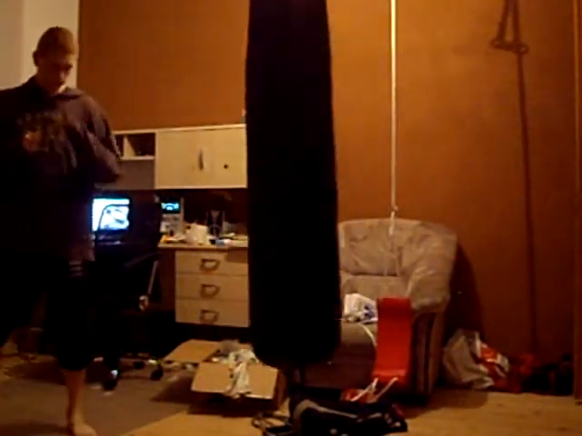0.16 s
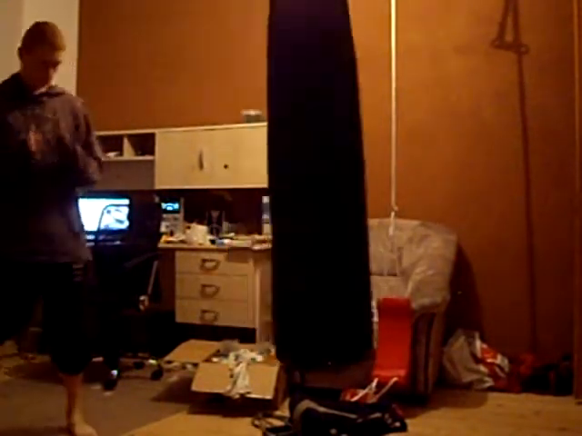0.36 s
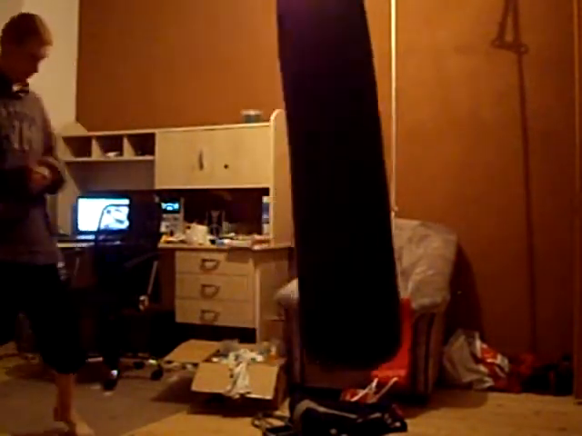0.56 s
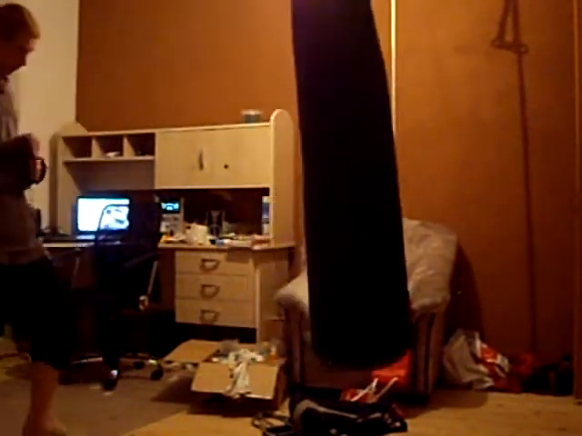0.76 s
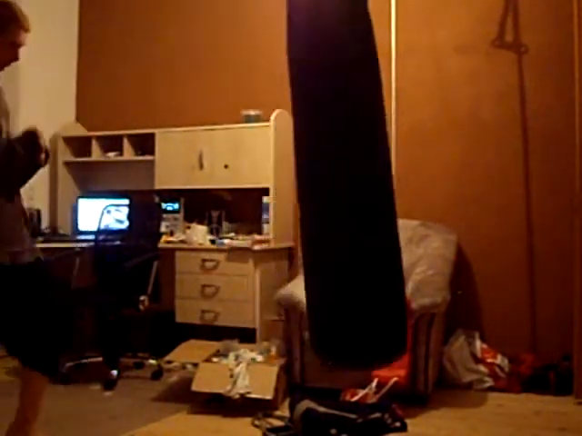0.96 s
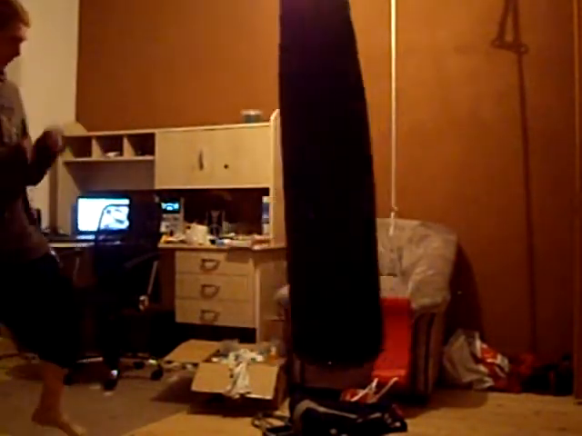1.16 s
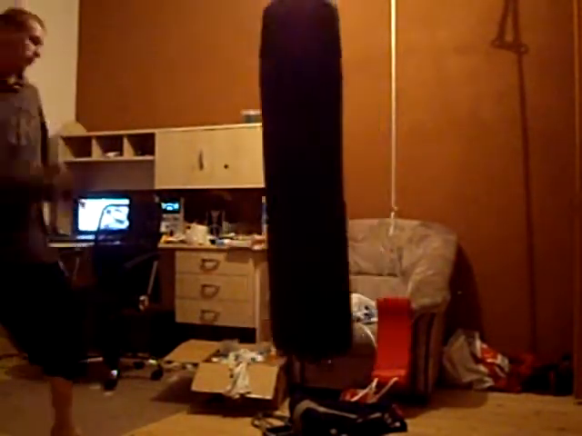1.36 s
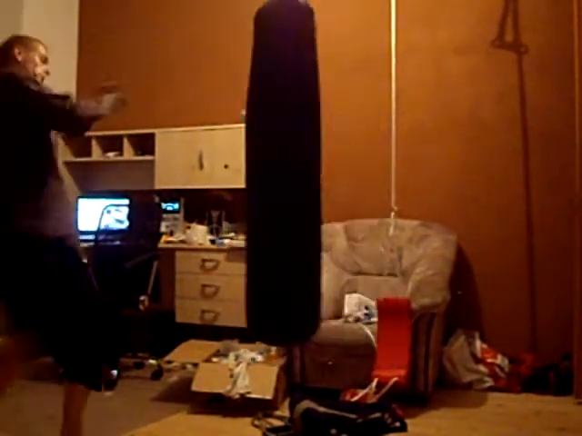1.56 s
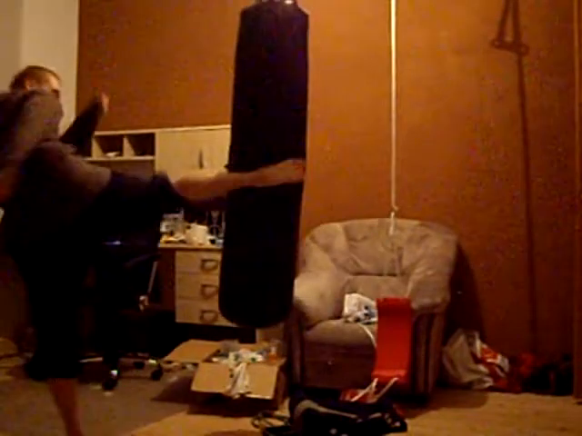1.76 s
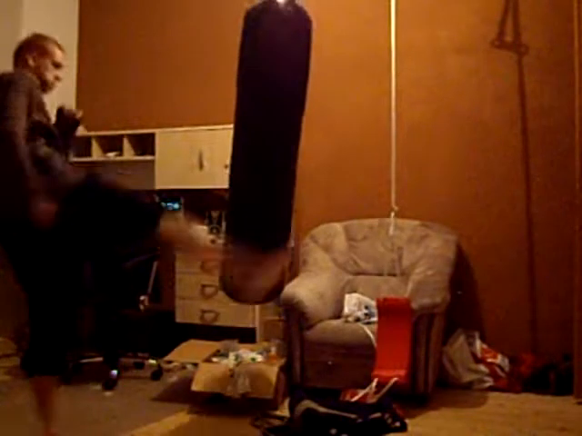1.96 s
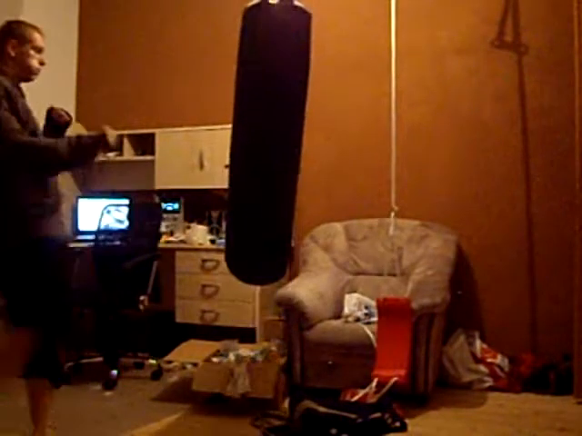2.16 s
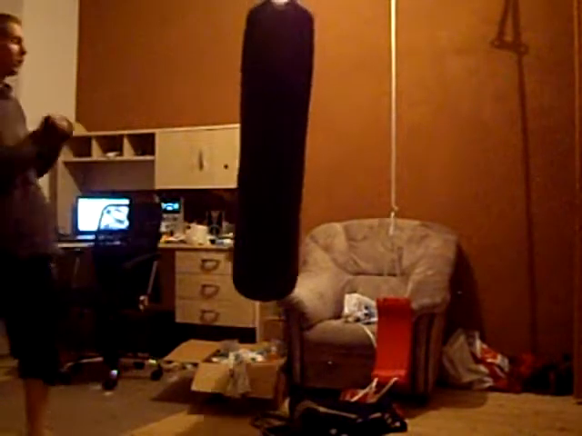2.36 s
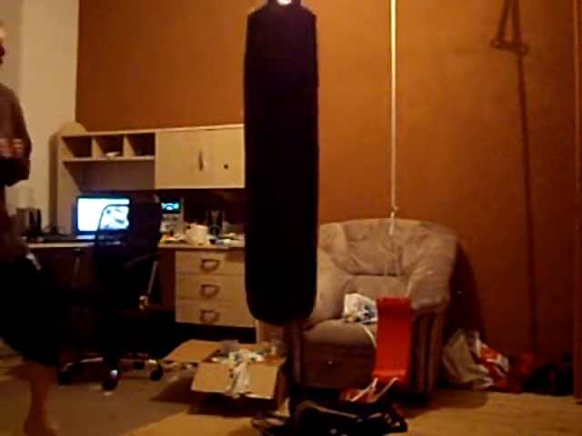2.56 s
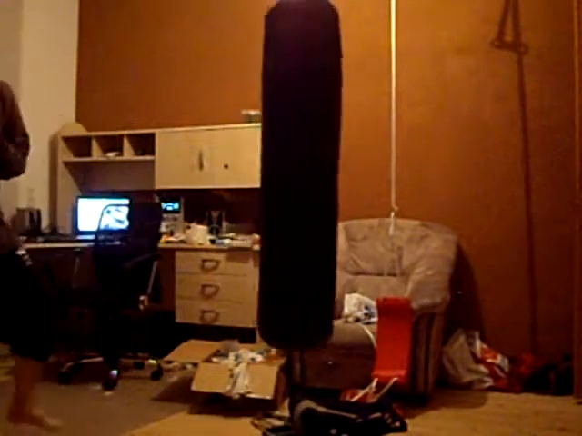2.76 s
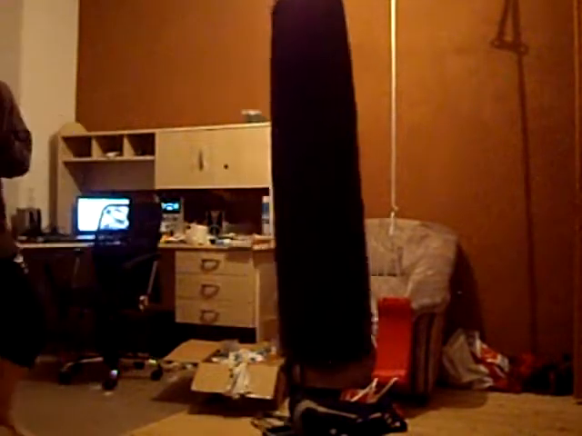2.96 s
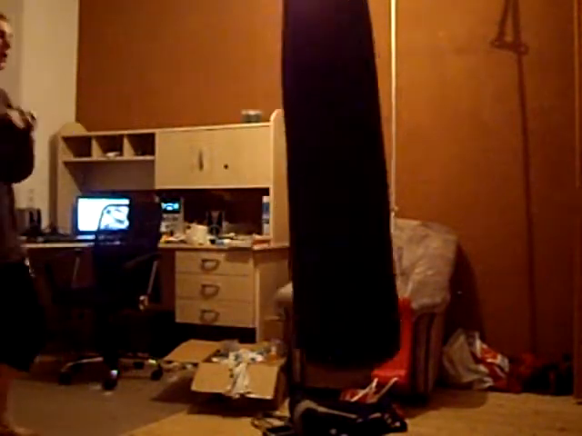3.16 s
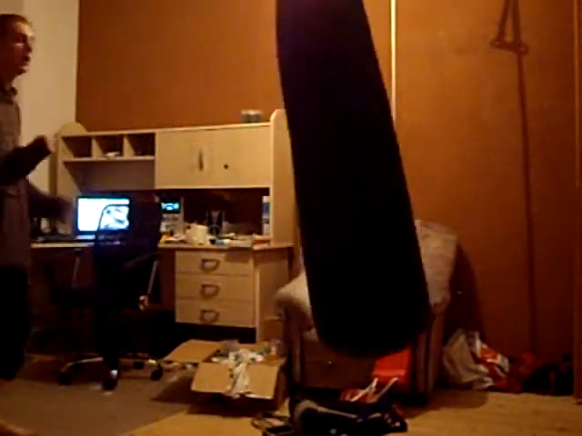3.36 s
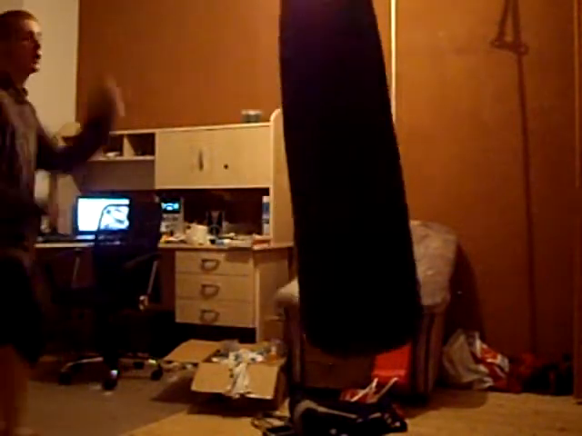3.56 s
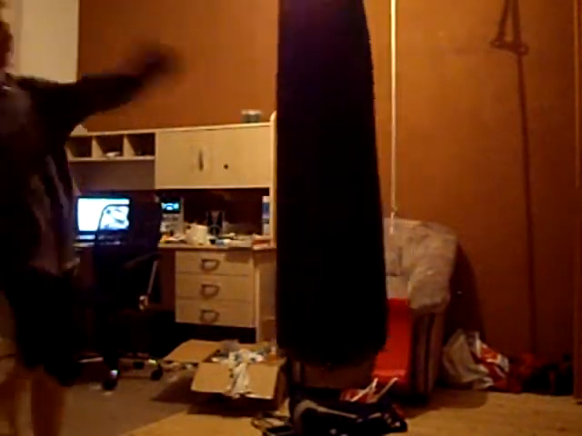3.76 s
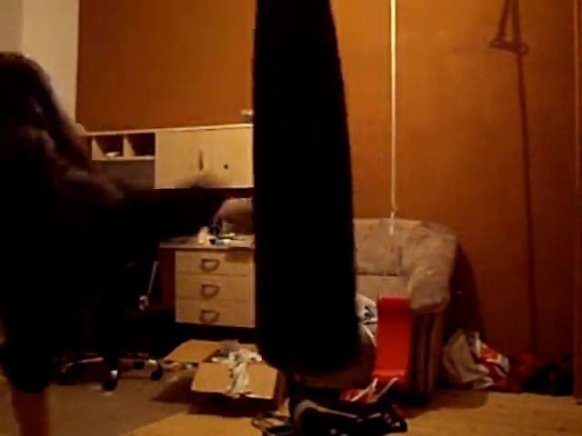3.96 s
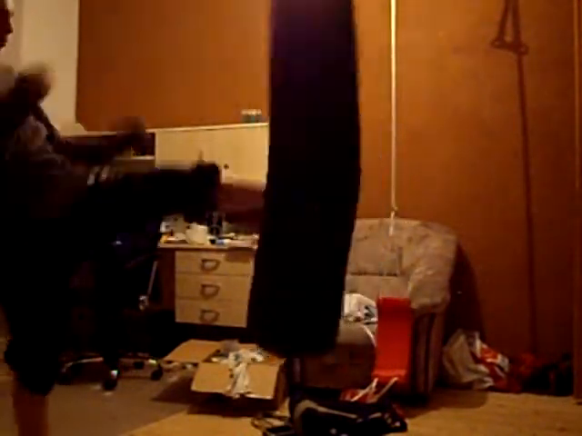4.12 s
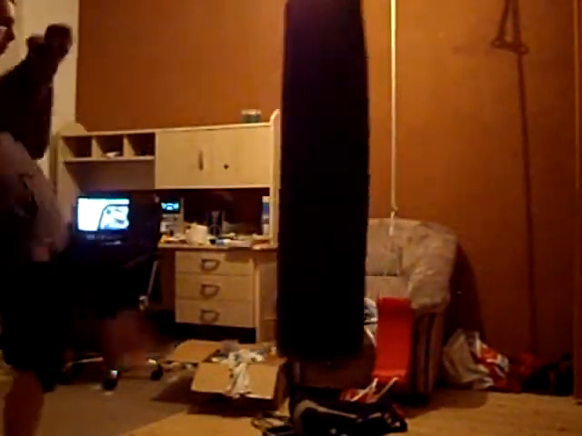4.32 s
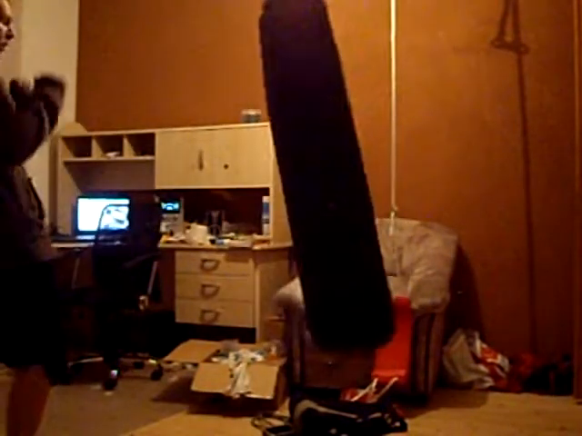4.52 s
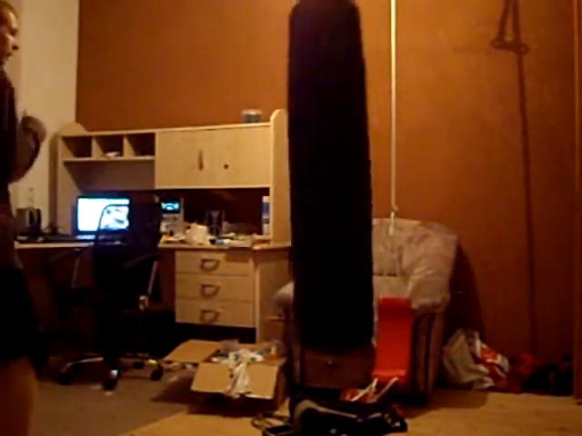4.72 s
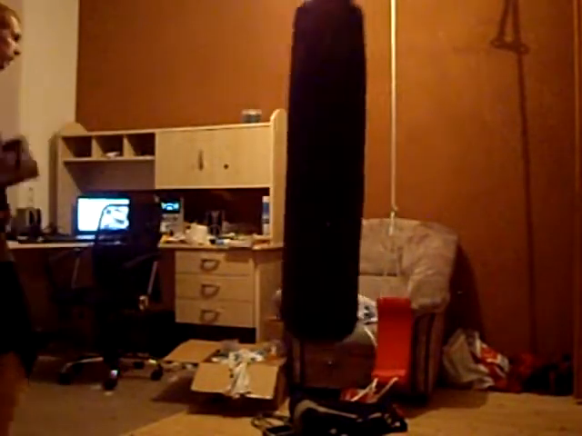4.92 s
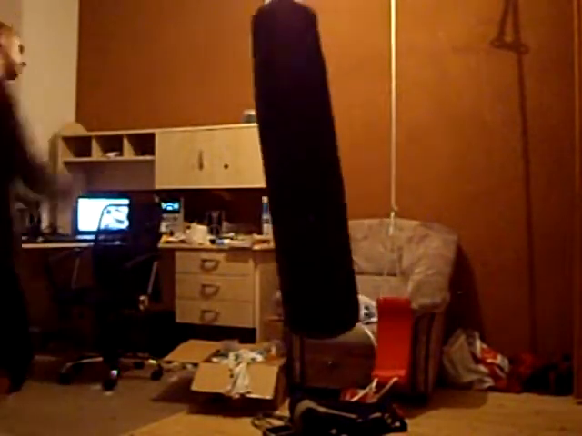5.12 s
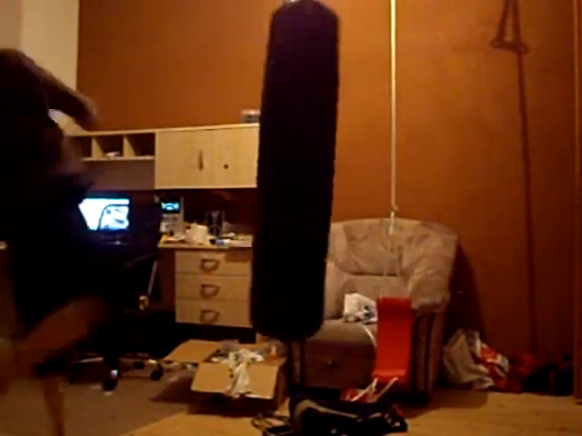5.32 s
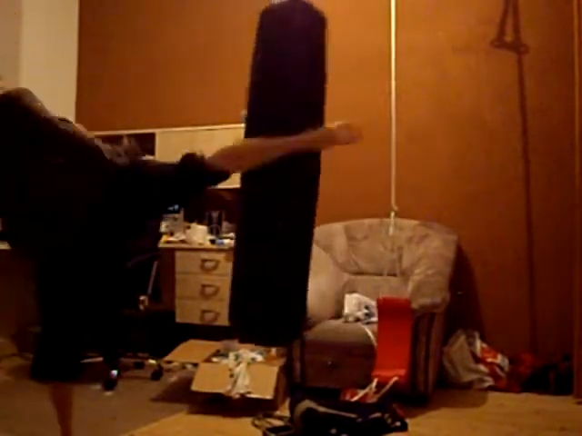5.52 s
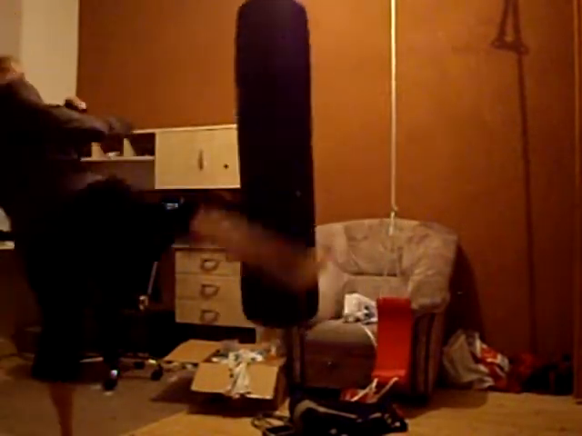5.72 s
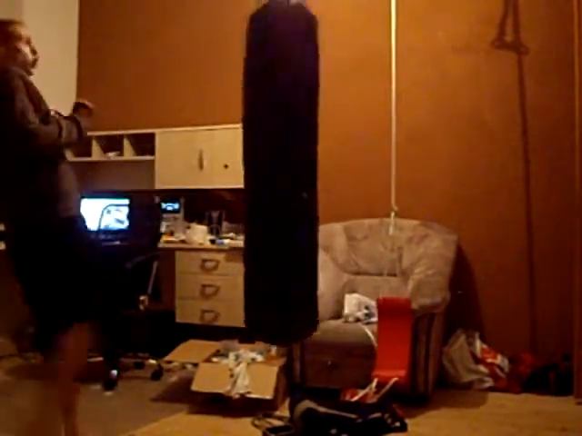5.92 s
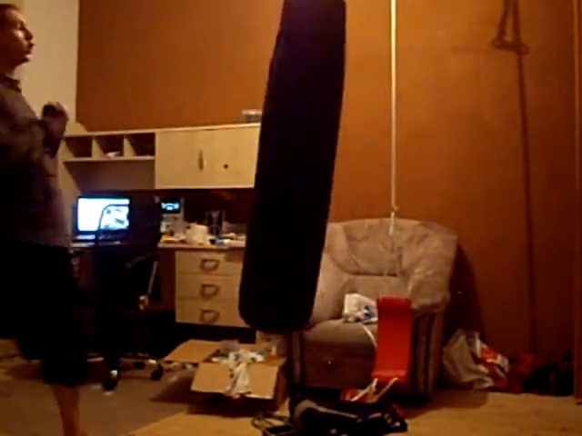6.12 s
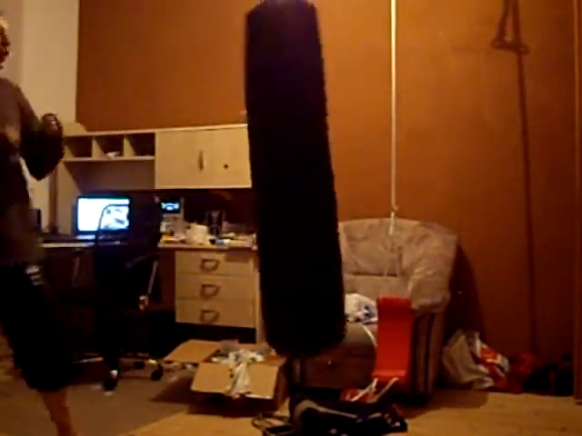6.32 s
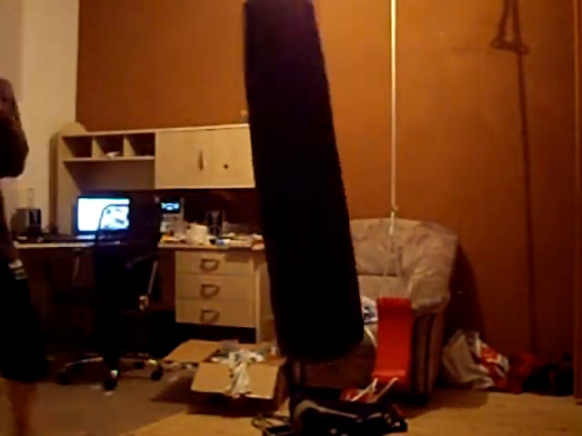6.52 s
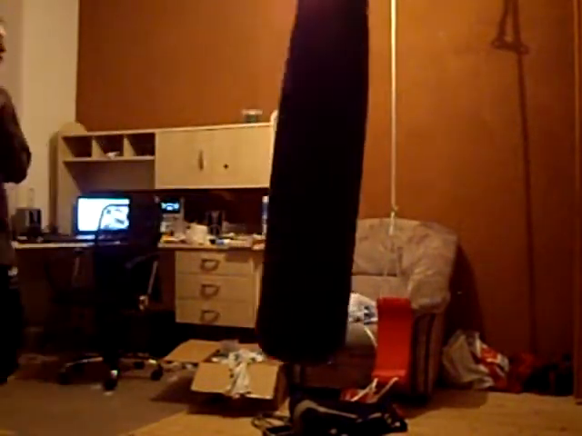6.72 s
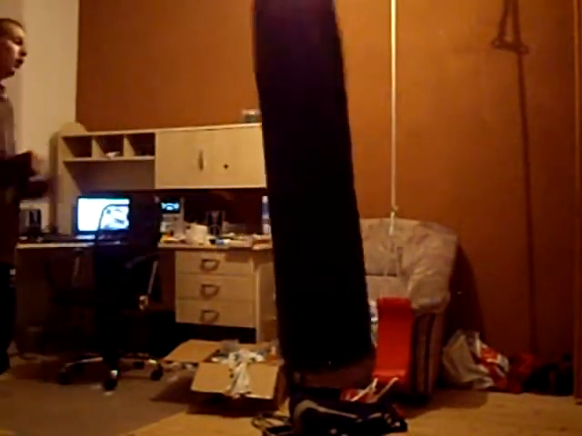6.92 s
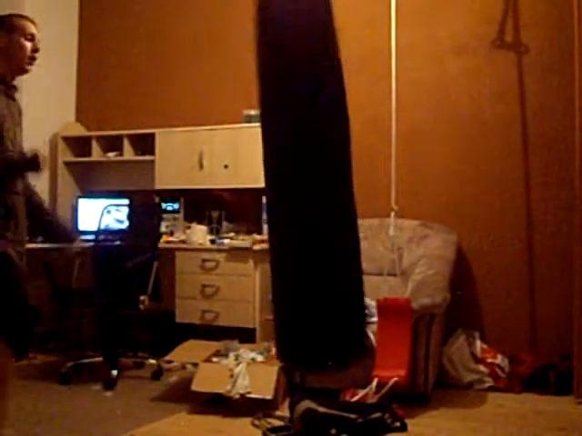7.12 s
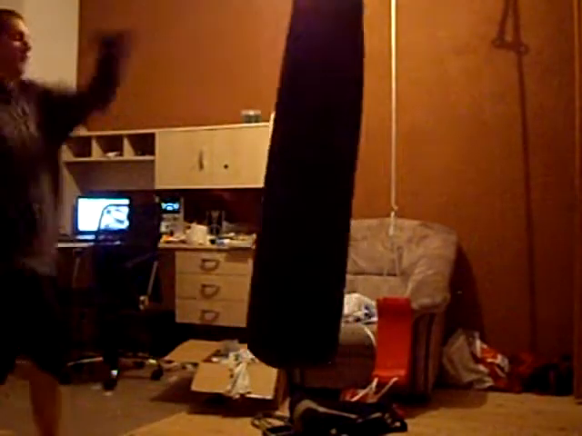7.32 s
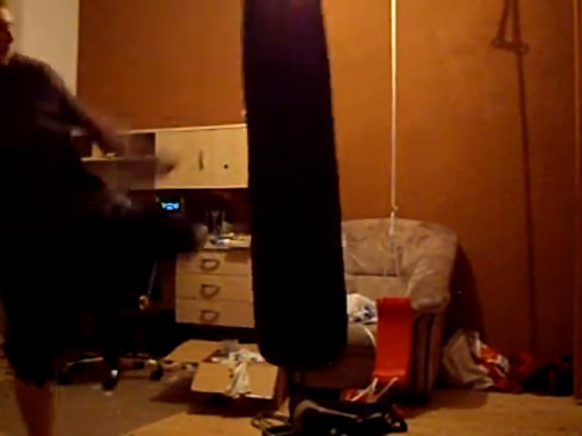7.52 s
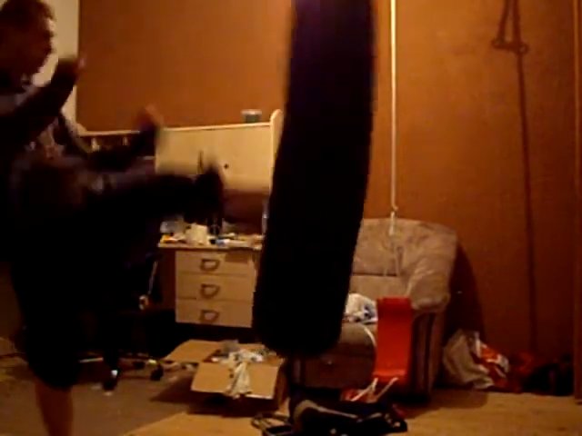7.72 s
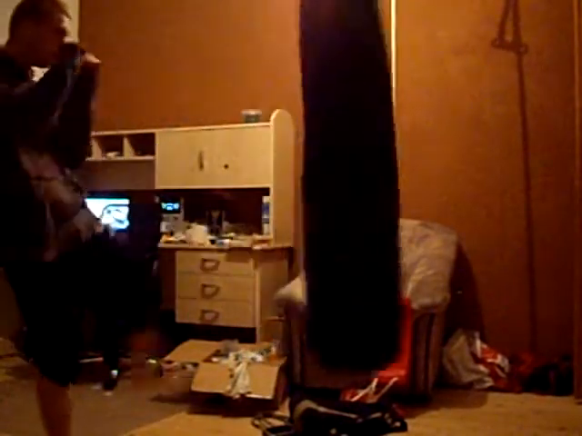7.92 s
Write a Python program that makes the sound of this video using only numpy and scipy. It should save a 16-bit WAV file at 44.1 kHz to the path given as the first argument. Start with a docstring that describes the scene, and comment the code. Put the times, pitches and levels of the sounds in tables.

```python
"""Bare feet step about on a springy wooden floor in a furnished room, clothes swishing, as a faint ring dies
away. Then four kicks hit a heavy hanging bag, the third softer, with footwork between: each kick sums damped
sines (thud of the filling, deep boom of the room) and two noise bursts (slap of the cover). Kicks and steps
feed a slow floor bounce; a low noise rises and falls with it; small pops follow the first kick. Hiss and rumble
run throughout; the sound is narrow-band with a notch, and loud peaks overload."""
import sys
import numpy as np
from scipy import signal
from scipy.fft import rfft, irfft
from scipy.io import wavfile
from scipy.ndimage import uniform_filter1d

SR = 44100
rng = np.random.default_rng(int(sys.argv[2]) if len(sys.argv) > 2 else 0)


def generate_wav(sig):
    """Save sig (samples, or channels by samples) to the path in sys.argv[1] as 16-bit PCM at SR."""
    pcm = np.round(np.clip(np.atleast_2d(sig).T, -1, 1) * 32767).astype(np.int16)
    wavfile.write(sys.argv[1], SR, pcm)


N = 356328
TIME_S = np.arange(N) / SR

# Levels in the tables are relative; each source adds its own gain.
# Kicks at first touch; the shin lands flat landing_s later: start_s, touch_db (re slap), landing_s,
# slap_db, slap_decay_s, tilt_db_per_octave, thud_db, boom_db, bounce_db
KICKS = [(1.7264, -3.5, .006, 0, 0.016, 0.84, -2.5, -3.5, -12.5),
         (3.991, -8.5, .016, -1, 0.02, 0.5, 0.5, -5.5, -10.5),
         (5.503, -7.5, .009, -10, 0.018, 0.2, -25, -12, -10.5),
         (7.563, -12, .011, -2, 0.026, 0.5, -6.5, -5, -15)]
# Slap of the cover: freq_hz, density_db (per Hz)
SLAP_SPECTRUM = [(100, 9), (200, 2.5), (310, -0.5), (450, 2), (750, 0), (1100, 0), (1600, -1.5), (2100, -4),
                 (3000, -4), (4200, -10), (5300, -7)]
# Hollow resonances of cover and nearby cabinets: freq_hz, width_hz, level_db (re broad slap)
SLAP_PEAKS = [(204.6, 18, -1), (270.3, 13, -1.5), (353.6, 8.5, -3), (526, 20, -3), (700, 48, -6),
              (843, 47, -6), (1108, 31, -7), (1290, 82, -13), (1570, 87, -8), (1772, 26, -3),
              (1920, 28, -5), (2677, 40, -7)]
# Packed filling: freq_hz, level_db, t60_s
BAG_MODES = [(73.4, -2.5, 0.17), (105.2, -9, 0.43), (149, -10, 0.27), (205.5, -10, 0.25)]
# Deep resonances of room and floor: freq_hz, level_db, t60_s
BOOM_MODES = [(33.18, -1.5, 1.29), (45.4, -22.5, 0.6), (57.2, -11, 0.83), (74, -18.5, 0.75),
              (129, -18, 0.69)]
# Reverberation: freq_hz, t60_s
ROOM_T60 = [(100, 0.28), (250, 0.37), (500, 0.51), (1000, 0.5), (2000, 0.51), (4000, 0.52), (5500, 0.46)]
# Footfalls: start_s, level_db, heel_db (weight on the heel)
STEPS = [(0.01, -45.5, 4.5), (0.344, -30, -12.5), (0.435, -31.5, -3), (0.801, -32, -12.5), (1.417, -39, 7),
         (1.486, -30, -6.5), (1.621, -31, -6.5), (1.683, -31.5, -7.5), (2.019, -28, -12.5),
         (2.292, -30, -11), (2.378, -28.5, -10.5), (2.835, -25, -26), (3.176, -25.5, -28),
         (3.339, -36.5, -6.5), (3.667, -24.5, 2.5), (3.715, -22.5, -0.5), (4.514, -26, -26.5),
         (5.139, -27.5, -5), (5.324, -26, 5.5), (5.381, -31, 10), (6.721, -28.5, -8.5), (7.276, -25.5, 5.5),
         (7.33, -24, -4.5)]
# Floorboards under a foot: freq_hz, level_db, t60_s
BOARD_MODES = [(129.5, 3.5, 0.19), (116.5, -11.5, 0.64), (157, -11, 0.17), (198.1, -15, 0.35)]
# Joists under a heel: freq_hz, level_db, t60_s
JOIST_MODES = [(41.5, 1.5, 0.95), (57.3, 3, 0.7), (75, -14.5, 0.26)]
# Dull scuff of a sole: freq_hz, density_db (per Hz)
SCUFF_SPECTRUM = [(60, -1.5), (130, 3), (200, -6), (300, -8), (800, -14.5), (3000, -33)]
# Low noise that follows the sway level: freq_hz, density_db (per Hz)
LOW_NOISE_SPECTRUM = [(60, -6), (200, 0), (450, 3.5), (750, -1.5), (1050, -14), (2000, -21), (5300, -45)]
# Brushes of clothes and soles: peak_s, level_db, swell_s (half amplitude this long before the peak)
SWISHES = [(0.422, -49, 0.023), (0.799, -46, 0.02), (1.39, -44, 0.044), (1.661, -36.5, 0.02),
           (2.33, -45.5, 0.072), (2.84, -46, 0.034), (3.17, -47, 0.068), (3.64, -38, .009),
           (4.52, -40, 0.026), (4.97, -43.5, 0.022), (5.04, -47, 0.042), (5.251, -39.5, 0.025),
           (6.42, -47.5, 0.16), (7.17, -44.5, 0.041), (7.279, -37.5, .04)]
# Rubbing fabric: freq_hz, density_db (per Hz)
CLOTH_SPECTRUM = [(150, 10.5), (400, 6), (900, -1.5), (1600, -6), (2600, -5), (4200, -5.5), (5300, -9.5)]
# Room rumble and microphone hiss: freq_hz, density_db (per Hz)
HISS_SPECTRUM = [(30, 8), (55, 9.5), (90, 9), (140, 9), (300, -9.5), (700, -5), (1200, -4.5), (2500, -2.5),
                 (3000, -6), (4200, -9), (5300, -16)]
# Faint ring, dying away from the start: freq_hz, level_db, t60_s
FAINT_RING = [(400, -40, 0.43), (814, -51, 1.1), (822, -55.5, 1.6)]
# Soft electrical pops: start_s
POPS_S = [2.5757, 2.7115, 3.6951, 4.9647, 5.366, 6.0371, 6.056, 6.3301, 7.2805, 7.88, 7.998]

# Foot settling time at the firm-step level; lighter steps settle more slowly.
SETTLE_S, FIRM_STEP_DB, SETTLE_FOLLOWS = 0.0096, -27.5, 0.7
# Second contact of the foot: nominal delay, level re the first.
ROLL_S, ROLL_DB = 0.075, -14
SWAY_HZ, SWAY_T60_S, SWAY_BUILD_S = 9.2, 5.85, 0.054
# Footfall push over its level; share of the heel weight that counts.
STEP_SWAY_DB, HEEL_SHARE = 6, 0.74
SWISH_T60_S, RUSTLE_DB = 0.77, -56.5
# The leg swings back after every kick.
RECOIL_S, RECOIL_DB, RECOIL_SWELL_S = 0.33, -45, 0.15
POP_HEIGHT = 0.12
BAND_EDGE_HZ, NOTCH_HZ, CUTOFF_HZ = 5360, (3090, 3670), 16000


def kicks(slap_gain_db=6.5, boom_lag_s=0.0061, dent_s=0.0011):
    """The foot touches and dents the filling, the shin slaps the cover, and the room booms."""
    out, t = np.zeros(N), TIME_S[:2 * SR]
    for s, touch_db, landing_s, slap_db, decay_s, tilt_db, thud_db, boom_db, _ in KICKS:
        dent = 1 - np.exp(-t / dent_s)
        thud = -from_db(thud_db) * dent * ring(BAG_MODES, t, detune=0.036)
        touch = slap(decay_s, tilt_db + 1.0, room_db=2.5, rise_s=0.00097)
        landing = slap(decay_s, tilt_db, room_db=-1.5)
        add(out, s, thud)
        add(out, s, from_db(slap_db + touch_db + slap_gain_db) * touch)
        add(out, s + landing_s, from_db(slap_db + slap_gain_db) * landing)
        add(out, s + boom_lag_s, from_db(boom_db) * ring(BOOM_MODES, t))
    return out


def slap(decay_s, tilt_db, room_db, rise_s=0.0029, build_s=0.008, crease_db=2.5, late_db=-17, late_t60_s=1.0):
    """A cover burst in half-octave bands; the room stores each band's energy and lets it die away."""
    t = TIME_S[:SR]
    # creases snap flat one after another, so the burst is uneven
    creases = from_db(crease_db * rms_one(uniform_filter1d(rng.standard_normal(SR), size=90)))
    burst = (1 - np.exp(-t / rise_s)) * np.exp(-t / decay_s)
    direct_power = (burst * creases) ** 2
    build = build_s * SR
    arriving = signal.lfilter([1 / build], [1, -np.exp(-1 / build)], burst ** 2)
    # a little sound keeps bouncing between the bare walls
    late = from_db(late_db) ** 2 * linger(arriving, late_t60_s)
    # neighbouring bands use independent noise
    white = rng.standard_normal((2, SR))
    edges_hz = 95 * 2 ** (np.arange(13) / 2)
    out = 0
    for k, (low, high) in enumerate(zip(edges_hz, edges_hz[1:])):
        hz = np.sqrt(low * high)
        bandpass = signal.butter(2, [low, high], "band", fs=SR, output="sos")
        band = signal.sosfilt(bandpass, white[k % 2])
        stored = linger(arriving, at_hz(ROOM_T60, hz)) + late
        colour = from_db(at_hz(SLAP_SPECTRUM, hz) + tilt_db * np.log2(hz / 1000))
        out = out + colour * band * np.sqrt(direct_power + from_db(room_db) ** 2 * stored)
    return resonate(out)


def resonate(x):
    """Narrow resonances ring on top of the broad slap."""
    out = x
    for hz, width_hz, db in SLAP_PEAKS:
        b, a = signal.iirpeak(hz, hz / width_hz, fs=SR)
        out = out + from_db(db) * signal.lfilter(b, a, x)
    return out


def linger(power, t60_s):
    """Sound energy fed into the room falls by 60 dB in t60_s."""
    keep = from_db(-120 / (t60_s * SR))  # -120 because from_db gives amplitude, not power
    return signal.lfilter([1 - keep], [1, -keep], power)


def footfalls(board_db=3, joist_db=-2, scuff_db=-15, scuff_t60_s=0.72, toe_lead_s=0.0069):
    """Soft soles load boards and joists in two contacts, with a dull scuff that lingers in the room."""
    out, t = np.zeros(N), TIME_S[:SR]
    for s, level_db, heel_db in STEPS:
        boards = from_db(board_db) * ring(BOARD_MODES, t, detune=0.035)
        joists = from_db(joist_db + heel_db) * ring(JOIST_MODES, t, detune=0.011)
        scuff = from_db(scuff_db - 60 * t / scuff_t60_s) * noise(SCUFF_SPECTRUM, size=SR)
        settle_s = SETTLE_S * from_db(SETTLE_FOLLOWS * (FIRM_STEP_DB - level_db))
        weight = 1 - np.exp(-(t / settle_s) ** 2)
        add(out, s - toe_lead_s, from_db(level_db) * weight * (boards + joists + scuff))
        # the rest of the foot comes down later and softer
        roll = weight * ring(BOARD_MODES, t, detune=0.076)
        add(out, s + ROLL_S * rng.uniform(0.47, 0.91), from_db(level_db + ROLL_DB) * roll)
    return out


def floor_bounce(low_noise_db=-31.0, throb=0.31, waver_db=3.5):
    """A slow sway below hearing; a low noise swells with its level, throbs and wavers."""
    size = sway()
    phase = 2 * np.pi * SWAY_HZ * TIME_S
    waver = rms_one(uniform_filter1d(rng.standard_normal(N), size=4000))
    throbbing = 1 - throb * np.cos(2 * phase)
    low_noise = from_db(low_noise_db + waver_db * waver) * noise(LOW_NOISE_SPECTRUM) * throbbing
    return size * (np.sqrt(2) * np.sin(phase) + low_noise)


def sway():
    """Size of the slow bounce: energy of kicks and footfalls builds up in the floor and drains away."""
    pushes = [(s, bounce_db) for s, *_, bounce_db in KICKS]
    pushes += [(s, level_db + STEP_SWAY_DB + HEEL_SHARE * heel_db) for s, level_db, heel_db in STEPS]
    response = (1 - np.exp(-TIME_S / SWAY_BUILD_S)) * from_db(-60 * TIME_S / SWAY_T60_S)
    energy = np.zeros(N)
    for s, db in pushes:
        add(energy, s, (from_db(db) * response) ** 2)
    return np.sqrt(energy)


def clothes(crumple_db=2.5):
    """Each move brushes fabric: it swells, catches and slips in folds, and dies away over a faint rustle."""
    recoils = [(s + RECOIL_S, RECOIL_DB, RECOIL_SWELL_S) for s, *_ in KICKS]
    energy = from_db(RUSTLE_DB) ** 2
    for s, db, swell_s in SWISHES + recoils:
        before_s = np.maximum(s - TIME_S, 0)
        after_s = np.clip(TIME_S - s, 0, 2)
        swell = 1 / (1 + (before_s / swell_s) ** 4)
        energy = energy + (from_db(db - 60 * after_s / SWISH_T60_S) * swell) ** 2
    folds = rms_one(uniform_filter1d(rng.standard_normal(N), size=500))
    return np.sqrt(energy) * from_db(crumple_db * folds) * noise(CLOTH_SPECTRUM)


def pops(recover_s=0.087):
    """The signal jumps by a small step, up or down, and sinks back exponentially."""
    out = np.zeros(N)
    for s in POPS_S:
        add(out, s, rng.choice([-1, 1]) * POP_HEIGHT * np.exp(-TIME_S[:SR // 2] / recover_s))
    return out


def background(hiss_db=-53):
    """Steady coloured noise for rumble and hiss, plus damped sines for the faint ring."""
    return from_db(hiss_db) * noise(HISS_SPECTRUM) + ring(FAINT_RING, TIME_S)


def ring(modes, t, detune=0):
    """Damped sines after one blow; detune is the random relative pitch spread per blow."""
    out = 0
    for hz, db, t60_s in modes:
        pitch_hz = hz * (1 + detune * rng.normal())
        out = out + from_db(db - 60 * t / t60_s) * np.sin(2 * np.pi * pitch_hz * t)
    return out


def noise(spectrum, size=N):
    """Gaussian noise coloured by a spectrum, rms 1."""
    hz = np.fft.rfftfreq(size, 1 / SR)
    in_band = (hz > 20) & (hz < BAND_EDGE_HZ + 500)
    white = rfft(rng.standard_normal(size))
    return rms_one(irfft(white * in_band * from_db(at_hz(spectrum, hz)), size))


def at_hz(points, hz):
    """Table value interpolated on a log-frequency axis."""
    table = np.array(points)
    return np.interp(np.log(hz + 1e-9), np.log(table[:, 0]), table[:, 1])


def from_db(db):
    """Decibels to amplitude."""
    return 10 ** (np.asarray(db) / 20)


def rms_one(x):
    """Scale to rms 1."""
    return x / np.sqrt(np.mean(x ** 2) + 1e-20)


def add(track, s, sound):
    """Mix a sound in at s seconds."""
    at = max(round(s * SR), 0)
    track[at:at + len(sound)] += sound[:max(N - at, 0)]


def scene():
    """Sum of all sources, one channel."""
    return (kicks() + footfalls() + floor_bounce() + clothes() + background() + pops())[None]


def record(dry, headroom=0.75, ceiling=0.66):
    """The input overloads, the band is narrowed and notched, and the remaining overshoots are clipped."""
    knee = 6  # higher bends more sharply
    overloaded = dry / (1 + np.abs(dry / headroom) ** knee) ** (1 / knee)
    passband = signal.firwin(401, [*NOTCH_HZ, BAND_EDGE_HZ], window=("kaiser", 4), fs=SR)
    narrow = signal.fftconvolve(overloaded, passband[None], "same")
    clipped = np.clip(narrow, -ceiling, ceiling)
    lowpass = signal.cheby2(12, 70, CUTOFF_HZ + 1000, fs=SR, output="sos")
    return signal.sosfilt(lowpass, clipped)


dry = scene()
out = record(dry)
generate_wav(out)
```